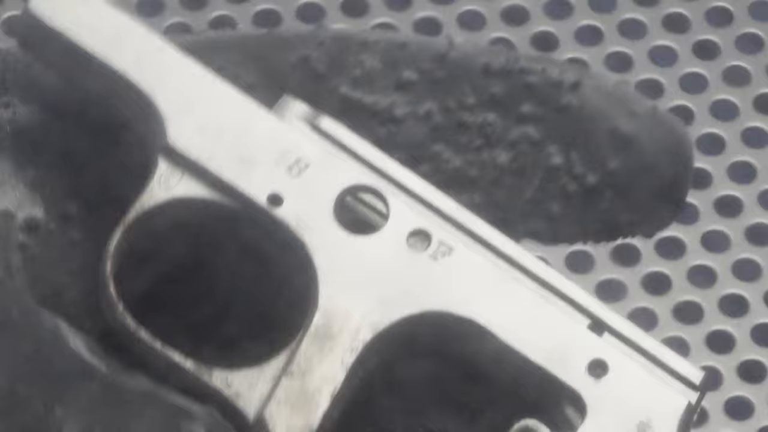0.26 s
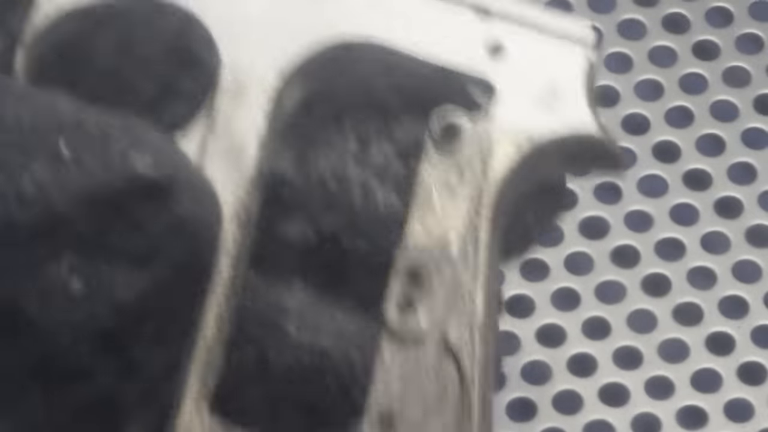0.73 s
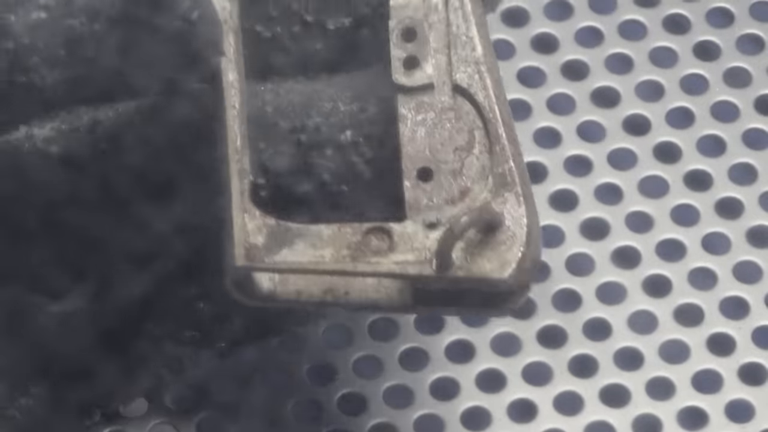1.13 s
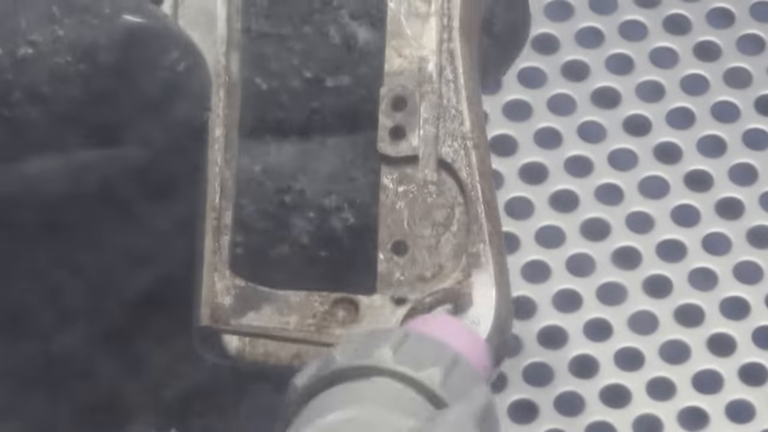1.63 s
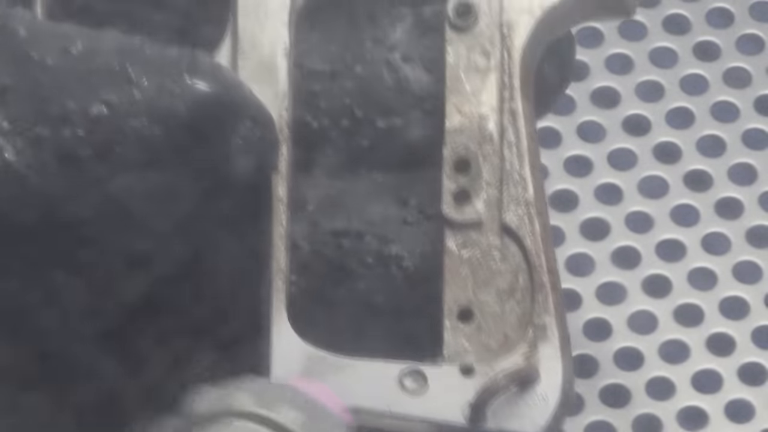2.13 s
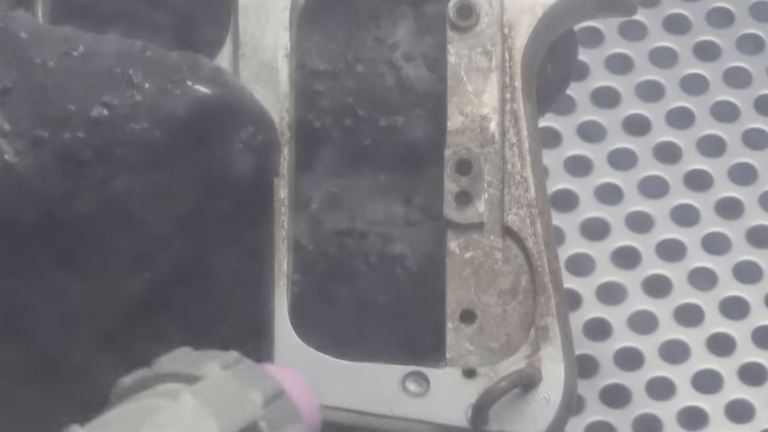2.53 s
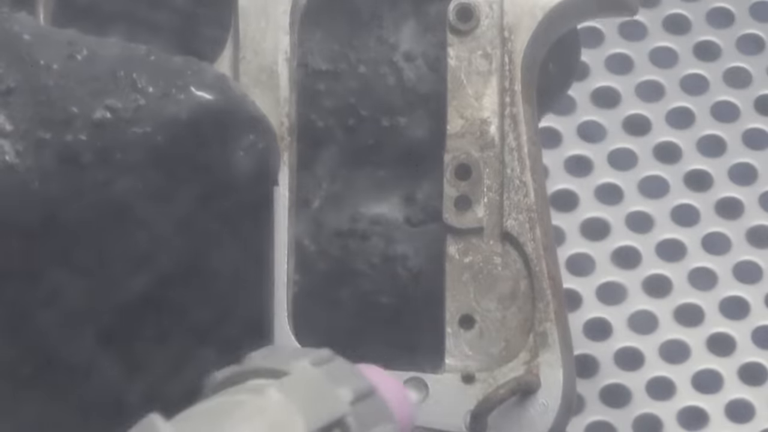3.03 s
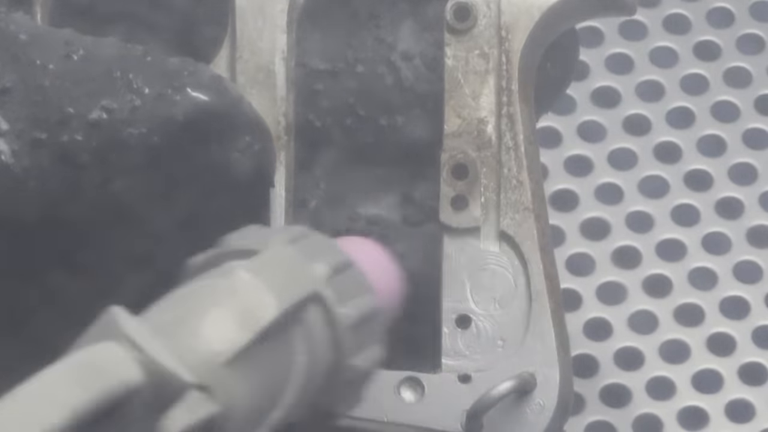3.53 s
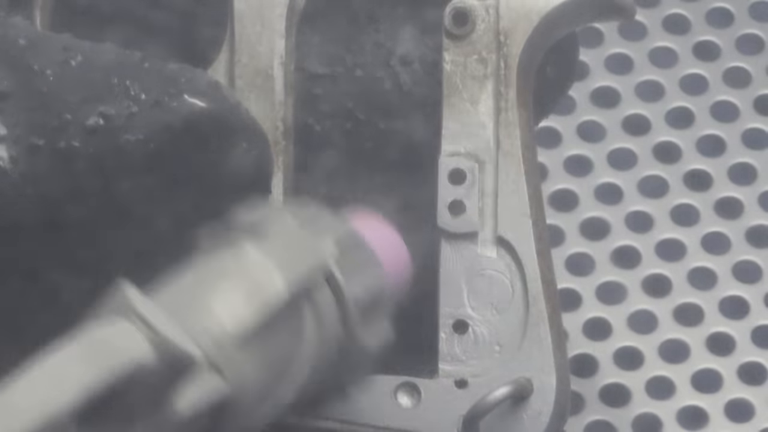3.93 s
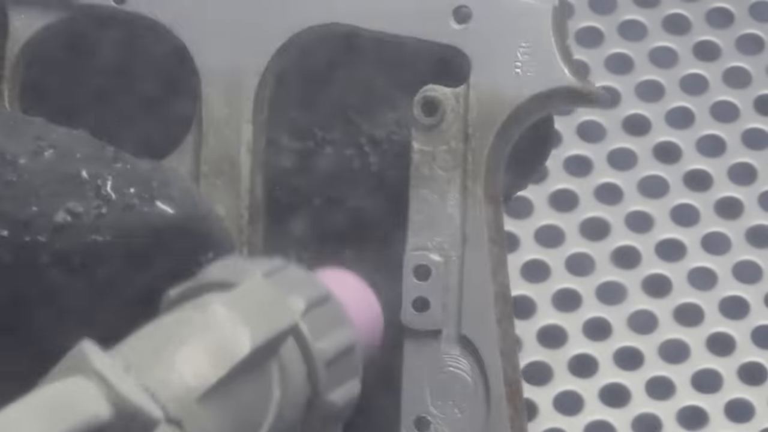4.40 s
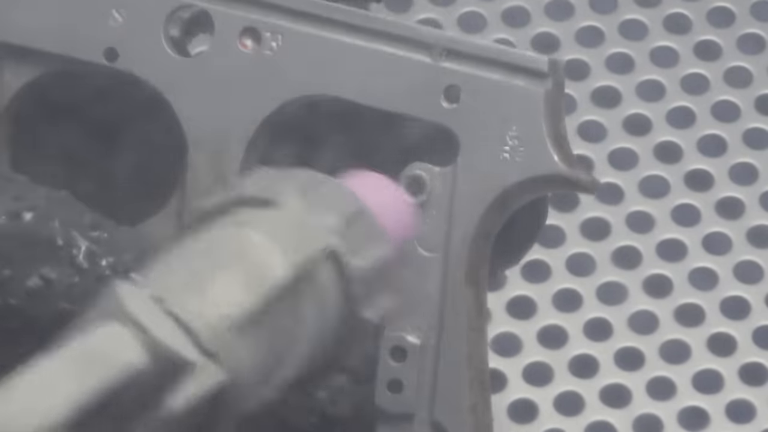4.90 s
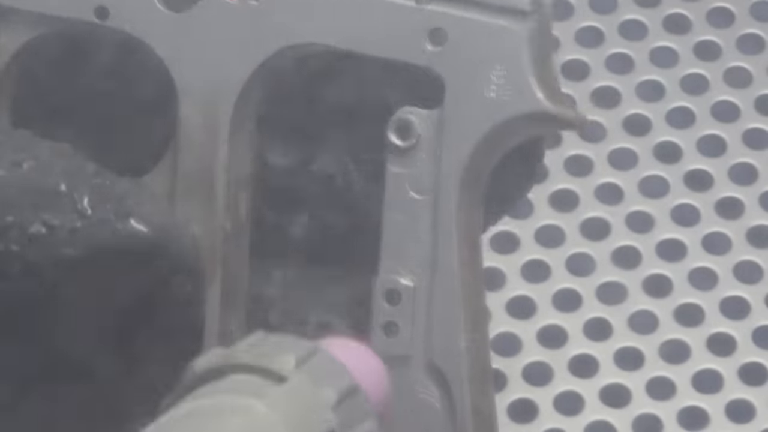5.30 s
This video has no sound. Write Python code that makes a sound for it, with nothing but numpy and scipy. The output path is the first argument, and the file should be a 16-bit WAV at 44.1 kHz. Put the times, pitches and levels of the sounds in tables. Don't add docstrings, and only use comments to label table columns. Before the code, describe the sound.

A close microphone pair hears a tool already running at constant speed: a coarse rapid buzz, steady bearing and gear whines, and a broad bright hiss of grit and air on steel. The cabinet adds boxy, metallic colour. Some high tones fade and others swell over the first four seconds; later the whine is slightly stronger and small hissing spurts crowd together. It never stops.

```python
import sys
import numpy as np
from scipy import signal
from scipy.fft import rfft, irfft, next_fast_len
from scipy.io import wavfile
from scipy.ndimage import uniform_filter1d, map_coordinates

SR = 44100
rng = np.random.default_rng(int(sys.argv[2]) if len(sys.argv) > 2 else 0)


def field_ratio(decibels):
    return 10 ** (np.asarray(decibels, dtype=float) / 20)


def master_out(mix):
    frames = np.transpose(np.atleast_2d(mix))
    ceiling = np.clip(frames, -1, 1)
    pcm = np.round(ceiling * 32767).astype(np.int16)
    wavfile.write(sys.argv[1], SR, pcm)


N = 244755
T = np.arange(N) / SR


def along(points, hz):
    f, v = np.transpose(points)
    return np.interp(np.log(hz + 1), np.log(f + 1), v)


def curves(rows):
    s, *columns = np.transpose(rows)
    return [np.interp(T, s, column) for column in columns]


def wobble(axis, step):
    knots = rng.standard_normal(int(axis[-1] / step) + 4)
    return map_coordinates(knots, [axis / step])


def filtered(x, response):
    m = next_fast_len(N + 8192)
    hz = np.fft.rfftfreq(m, 1 / SR)
    return irfft(rfft(x, m) * response(hz), m)[..., :N]


def tone(hz, db):
    turns = np.cumsum(hz) / SR + rng.random()
    return np.sqrt(2) * field_ratio(db) * np.sin(2 * np.pi * turns)


def patched(x, size, tall, long, depth_db):
    z = signal.stft(x, nperseg=size)[2]
    field = uniform_filter1d(rng.standard_normal(z.shape), size=tall, axis=0)
    field = uniform_filter1d(field, size=long, axis=1)
    z = z * field_ratio(depth_db * field / field.std())
    return signal.istft(z, nperseg=size)[1][:N]


def bearing_whines():
    # (pitch [Hz], level [dB rms], wander [Hz])
    rotating_parts = [(196.5, -98, .2), (223.4, -100, .2), (263, -85, .2), (328.4, -92, .3),
                      (369.2, -86, .2), (394.3, -92, .3), (458.4, -91, .1), (553.2, -85, .1),
                      (916.7, -70, .15), (1375, -72, .1), (1833.4, -79, .2), (2908.5, -69, .3),
                      (3324, -71, 4), (3378, -76, 4), (5593, -79, 2), (9819, -74, 8)]
    out = np.zeros(N)
    for hz, db, wander in rotating_parts:
        out += tone(hz + wander * wobble(T, .1), db + wobble(T, .22))
    return out


def gear_whine():
    # (time [s], mesh pitch [Hz], level [dB rms])
    teeth = [(0, 2073.3, -66), (1, 2073.4, -63), (3, 2073.4, -62), (4.2, 2074.8, -61.5), (5.55, 2075, -61)]
    # (multiple of the mesh pitch [1], level [dB])
    overtones = [(1, 0), (2, -9), (3, -16), (7, -2)]
    mesh_hz, mesh_db = curves(teeth)
    mesh_hz = mesh_hz + .8 * wobble(T, .2)
    return sum(tone(k * mesh_hz, mesh_db + db + wobble(T, .15)) for k, db in overtones)


def cabinet_hiss():
    # (frequency [Hz], level [dB per Hz])
    noise_levels = [(30, -128), (90, -125), (170, -122.5), (240, -116), (330, -110.2), (450, -106.8),
                    (600, -97.1), (780, -92.5), (1000, -86.1), (1300, -93.7),
                    (1700, -89), (2200, -87.5), (3000, -88.3), (4000, -92.6), (5300, -89.4), (6800, -92.8),
                    (8500, -100.8), (8520, -94.5), (10000, -94.5), (11500, -95.2), (13000, -89.9),
                    (14500, -94.3), (15700, -91.8)]
    # (frequency [Hz], width [Hz], lift [dB])
    resonances = [(266, 46, 10.1), (304, 13, -5.6), (362, 30, 6.1), (518, 29, 4.4), (634, 103, -7.8),
                  (654, 24, -4.0), (700, 12, 2.7), (761, 50, -5.3), (892, 88, 5.7), (1081, 24, -2.6),
                  (1153, 25, -2.3), (1232, 65, 1.8),
                  (1442, 67, -3.5), (1533, 61, 2.3), (2264, 500, -5.4), (2302, 35, -3.0), (2450, 221, 4.6),
               (3134, 240, -2.9), (4032, 28, 3.4), (4415, 500, 5.2), (4439, 29, 2.4), (4503, 54, -2.1),
               (4780, 57, -5.4), (4801, 188, 8.1), (4948, 62, 8.1), (5480, 295, -4.2), (5517, 39, 3.5),
               (5901, 500, 4.6), (6222, 24, 4.0), (6332, 126, 2.6), (6570, 29, -2.0), (6634, 68, 3.3),
               (6747, 50, 5.1), (6931, 51, 6.0), (7163, 254, 9.0), (7594, 74, -3.8), (7681, 500, 11.4),
               (7839, 95, -6.9), (8180, 321, 11.5), (8465, 92, 8.1),
                  (8931, 500, 2.2), (9305, 35, 4.1), (9759, 30, -2.7), (9839, 47, 3.8), (9974, 35, 3.4),
                 (10294, 97, 3.0), (10860, 500, 3.3), (10911, 89, -2.5), (11002, 41, 3.0), (11327, 52, 4.5),
                 (11849, 500, 3.7), (12056, 48, -4.8), (12535, 136, -3.5), (13044, 138, -2.4),
                 (13216, 288, 1.2), (13915, 42, -3.6), (14365, 36, 3.0), (14490, 52, 3.8),
                 (14829, 126, 2.3), (15226, 259, -2.4)]

    white = patched(rng.standard_normal(N), 512, 8, 20, depth_db=.6)
    white = patched(white, 2048, 2, 70, depth_db=1.3)
    white = white / white.std() * np.sqrt(SR / 2)

    def color(hz):
        db = .45 + along(noise_levels, hz)
        for center, width, lift in resonances:
            db = db + lift / (1 + (2 * (hz - center) / width) ** 4)
        return field_ratio(db)

    return filtered(white, color)


def grit_spurts(noise):
    # (time [s], level over the steady stream [dB])
    spurts = [(.69, 4), (2.86, 3.5), (3.43, 4), (3.62, 3.5), (4.03, 3.5), (4.14, 5.5), (4.5, 4),
              (4.64, 3.5), (4.76, 2), (4.87, 4.5), (5.09, 2.5), (5.41, 2.5)]
    rise_s, fall_s = .05, .03
    stream_db = -1.8 + .3 * T
    for s, db in spurts:
        stream_db = stream_db + db * np.exp(-((T - s) / np.where(T < s, rise_s, fall_s)) ** 2)
    fine = filtered(noise, lambda hz: np.clip((hz - 12500) / 2500, 0, 1))
    return noise + (field_ratio(stream_db) - 1) * fine


def shaft_knocks():
    # (time [s], speed [turns per s])
    speed = [(0, 89.016), (1.5, 89.0205), (2.5, 89.0335), (3.5, 89.0425), (5.55, 89.047)]
    thuds = [
        (.72, -1),
        (.806, -.86),
        (.035, -.38),
    ]
    knocks = [
        (.5897, 1),
        (.982, .41),
        (.3385, .29),
        (.7692, .13),
    ]
    ticks = [
        (.5435, 1),
        (.8531, -.65),
        (.3063, -.41),
        (.4503, .21),
    ]
    clicks = [
        (.5613, 1),
        (.508, .9),
        (.61, .9),
        (.84, .75),
        (.0604, .45),
    ]
    # (multiple of the turn [1], level [dB
    shaft_orders = [(2, -82.6), (3, -77.7), (4, -66.4), (5, -73.0), (6, -68.4), (7, -73.2), (8, -64.2),
                     (9, -69.2),
                     (10, -65.5), (11, -68.3), (12, -81.8), (13, -63.5), (14, -69.2), (15, -57.0),
                    (16, -69.1), (17, -64.9), (18, -58.1), (19, -62.8), (20, -63.5), (21, -65.3),
                    (22, -61.0), (23, -73.0), (24, -65.5), (25, -71.2), (26, -64.9), (27, -89.0),
                    (28, -64.7), (29, -74.9), (30, -64.3), (31, -63.1), (32, -81.1), (33, -70.9),
                    (34, -70.2), (35, -67.2), (36, -80.5), (37, -68.3), (38, -70.7),
                     (39, -77.8), (42, -73.8), (43, -76.8), (49, -67.4), (51, -65.9), (52, -70.6),
                     (55, -72.9), (56, -77.8), (58, -73.5), (60, -72.1), (61, -77.1), (62, -75.2),
                     (66, -78.4), (67, -69.1), (68, -76.0), (69, -71.7), (70, -68.9), (71, -71.3),
                     (72, -78.8), (73, -74.8), (75, -78.2), (77, -78.4), (80, -77.8), (89, -78.9),
                     (143, -78.7), (148, -74.8), (149, -75.4), (150, -71.7), (153, -77.6), (160, -78.6)]
    # (multiple of the turn [1], level [dB rms])
    faint_orders = [(39, -93), (75, -80), (100, -89), (130, -86.5), (145, -79), (170, -86)]
    # (multiple of the turn [1], level before [dB rms], level after [dB rms], time [s])
    hand_shifts = [
        (51, -64.3, -71, 4.1),
        (70, -65.3, -71.5, 2.1),
        (148, -77.5, -69, 2.6),
        (149, -67, -78, 1.1),
        (150, -65.5, -72.5, .7),
    ]
    shift_s = .3
    scatter_db, sway_db, smear_rad = 3, 2.5, 1.2

    turn = np.exp(2j * np.pi * np.cumsum(curves(speed)[0]) / SR)
    luck = rng.standard_normal((171, 2))
    coarse = T[::64]
    level = {k: along(faint_orders, k) + scatter_db * luck[k, 0] for k in range(39, 171)}
    level.update(dict(shaft_orders))
    for k, before, after, s in hand_shifts:
        level[k] = before + (after - before) / (1 + np.exp((s - coarse) / shift_s * 2))

    out, spin = np.zeros(N), turn
    for k in range(2, 171):
        spin = spin * turn
        blows = thuds if k < 10 else knocks if k < 23 else ticks if k < 44 else clicks
        place, strength = np.transpose(blows)
        beat = np.sum(strength * np.exp(-2j * np.pi * k * place))
        beat = beat / abs(beat)
        if k > 71:
            beat = beat * np.exp(1j * smear_rad * luck[k, 1])
        depth_db = .8 if np.ndim(level[k]) else sway_db * min(k / 60, 1) ** 2
        gain = np.repeat(field_ratio(level[k] + depth_db * wobble(coarse, .566)), 64)[:N]
        out += gain * (spin.real * beat.real - spin.imag * beat.imag)
    return np.sqrt(2) * out


def scene():
    # (frequency [Hz], level [dB])
    port_difference = [(250, -36), (400, -36), (530, -31), (620, -22), (760, -44), (1100, -17), (1400, -34),
                       (1800, -22.5), (2250, -17.5), (3000, -22.5), (4400, -16), (5300, -24), (6100, -17),
                       (8000, -25.5), (11000, -14), (15000, -18.5)]
    steady = bearing_whines() + gear_whine() + shaft_knocks()
    noise = grit_spurts(cabinet_hiss())

    def echo(hz):
        strength = field_ratio(along(port_difference, hz) + 2.9 * wobble(hz, 70))
        return strength * np.exp(1.3j * wobble(hz, 150))

    diffuse = cabinet_hiss()
    side = filtered(steady + .7 * noise + diffuse, echo)
    return steady + noise + np.array([side, -side])


def roll_off(x):
    return signal.sosfilt(signal.butter(12, 16650, fs=SR, output="sos"), x)


def record(dry):
    top_hz = 15740
    mix = filtered(dry, lambda hz: hz < top_hz)
    return roll_off(mix)


dry = scene()
out = record(dry)
master_out(out)
```